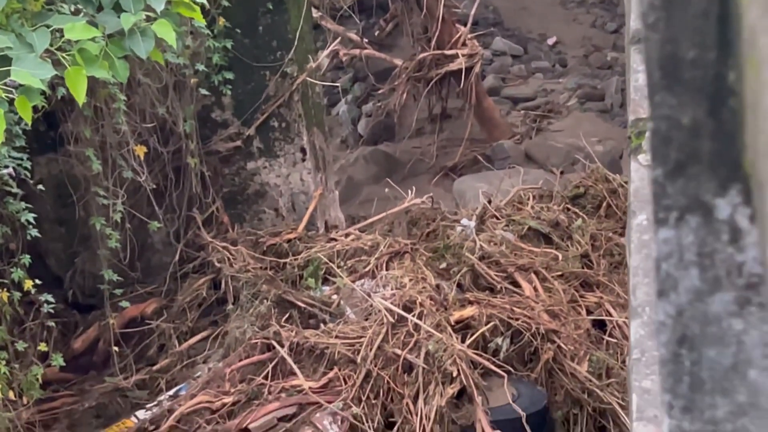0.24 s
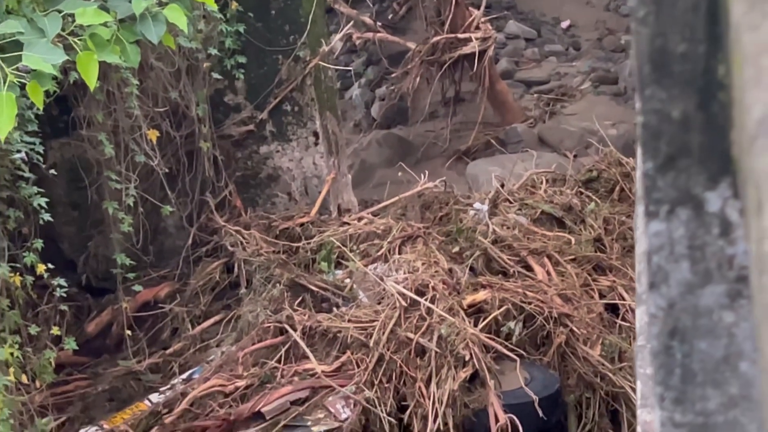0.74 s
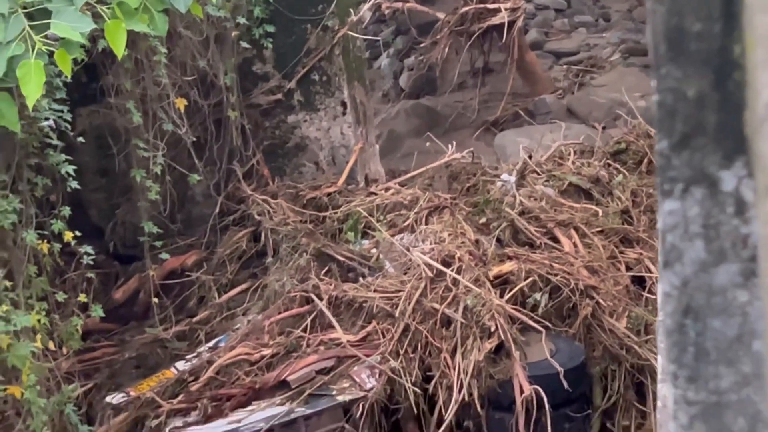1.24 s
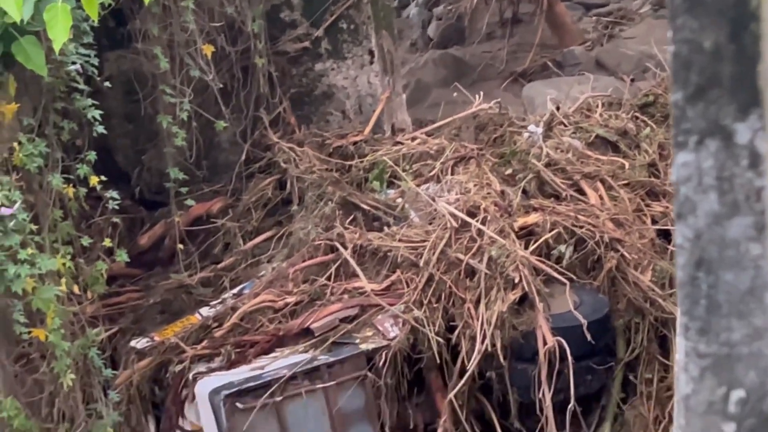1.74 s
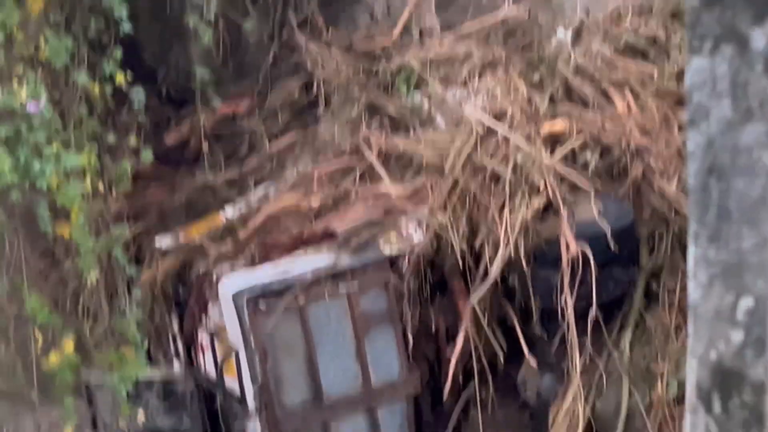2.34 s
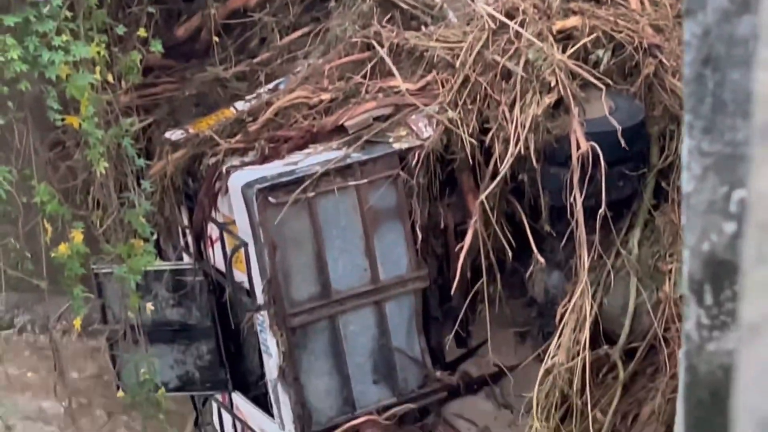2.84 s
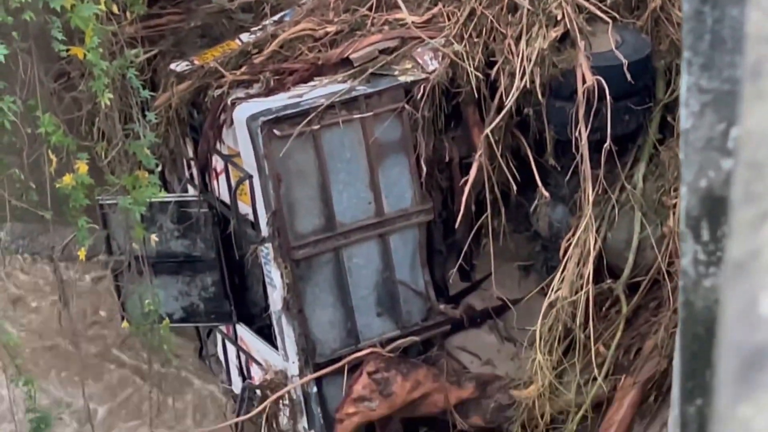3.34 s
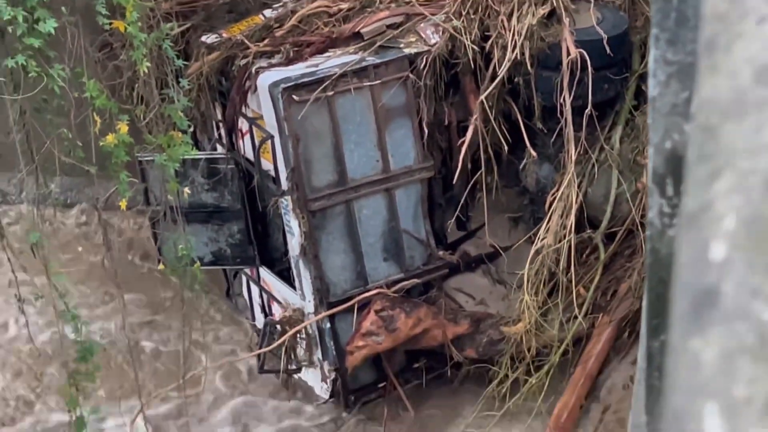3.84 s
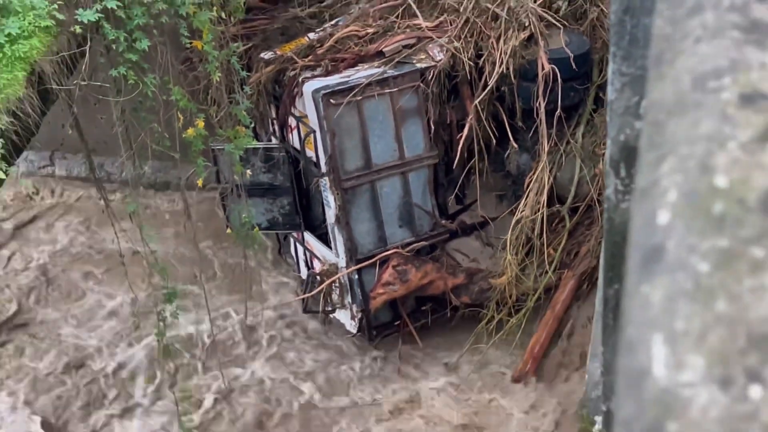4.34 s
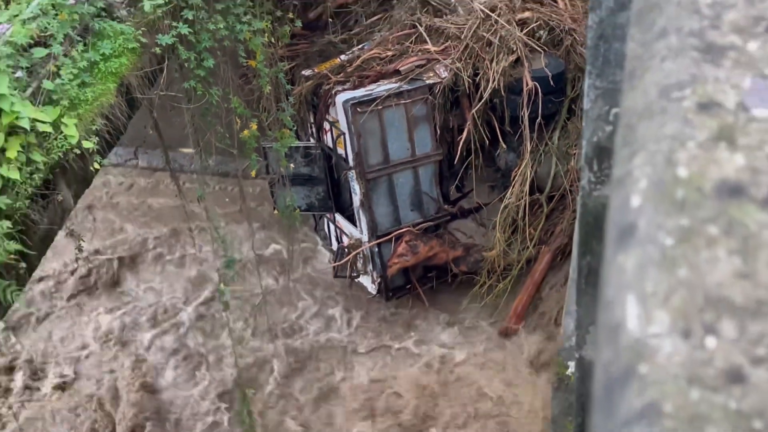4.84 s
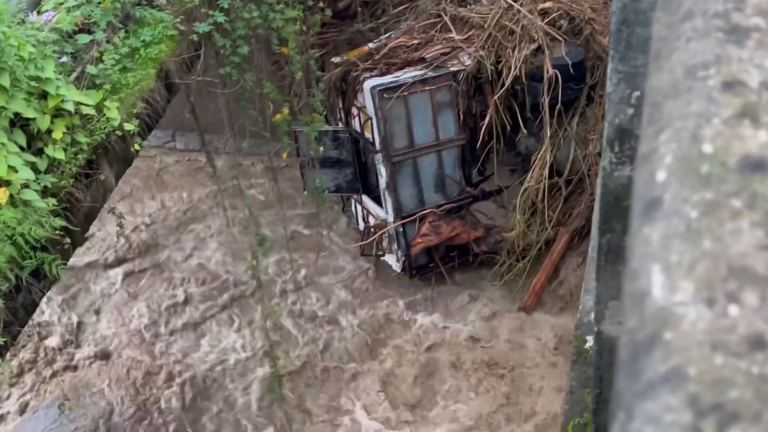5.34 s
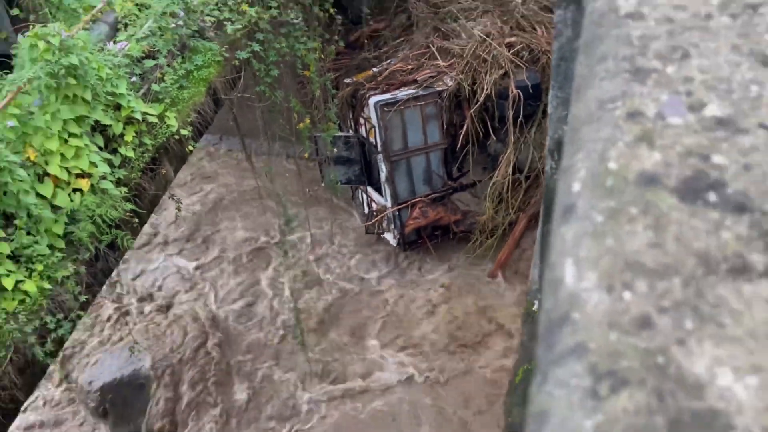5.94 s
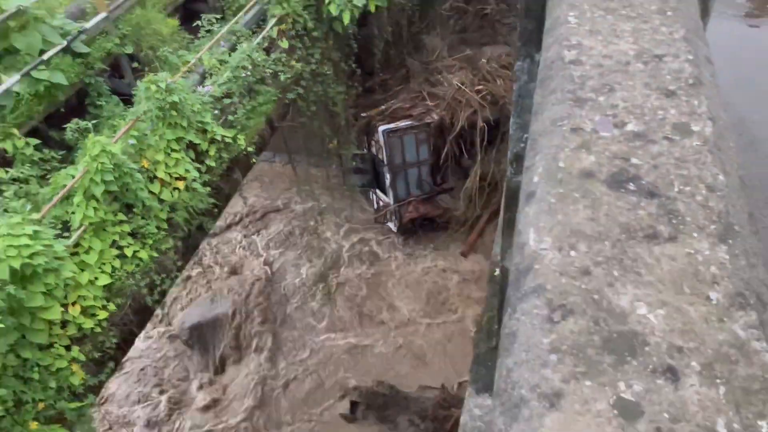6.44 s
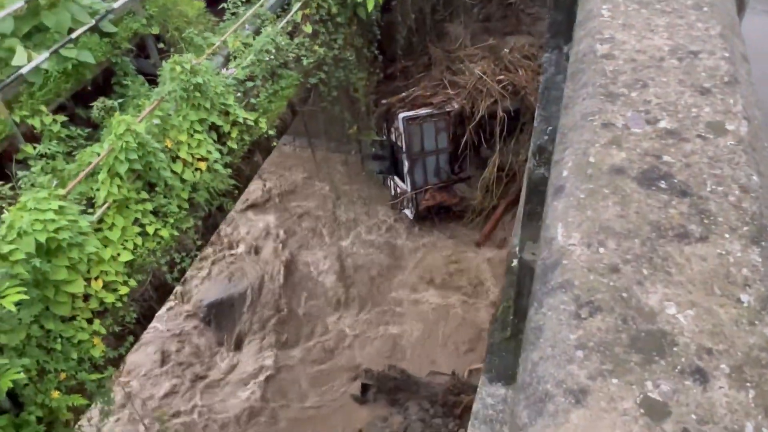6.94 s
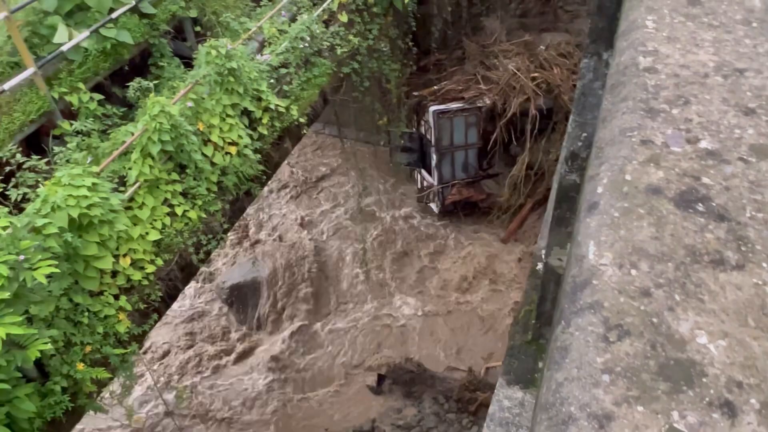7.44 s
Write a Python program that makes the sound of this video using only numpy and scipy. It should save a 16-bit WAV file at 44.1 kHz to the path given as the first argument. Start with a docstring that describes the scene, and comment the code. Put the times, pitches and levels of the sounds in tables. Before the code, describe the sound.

A continuous broadband river roar, heavy in the lows and low mids, with soft fizz on top and faint momentary swells. After about four seconds a faint piercing squeak and wavering squeal sound briefly, slightly left, like wet friction. Around six seconds the microphones open from a narrow focused beam to a broad stereo view of the same rushing water, which never stops.

```python
"""Flooded river under a bridge

A flooded river roars under a bridge, heard from the parapet: shaped noise for churning water and spray,
ringing bubbles, and brief random swells in narrow bands. A thin squeal, like a wet brake, sounds briefly,
made of gliding sine tones. The camera zooms out, and its microphones go from a narrow, nearly mono
beam to a wide stereo pair."""
import sys
import numpy as np
from scipy import signal
from scipy.fft import rfft, irfft, next_fast_len
from scipy.io import wavfile
from scipy.ndimage import uniform_filter1d, map_coordinates

SR = 44100
rng = np.random.default_rng(int(sys.argv[2]) if len(sys.argv) > 2 else 0)


def persist_wave(psi):
    """Save psi, clipped to +-1, as 16-bit WAV."""
    counts = np.round(np.clip(psi, -1, 1) * 32767).astype(np.int16)
    wavfile.write(sys.argv[1], SR, np.atleast_2d(counts).T)


N = 338247

# tone shape of the water's roar: (frequency [Hz], relative level [dB per Hz])
ROAR_SHAPE = [(22, -35), (32, -26), (50, -8.5), (85, -2), (150, -0.66), (320, -.4), (420, -3), (580, -6),
              (1000, -5.5), (1350, -8.5), (3000, -15.5), (5500, -20), (7000, -23.5), (15500, -29.5)]
# level of the spray before the microphones: (time [s], level [dB])
SPRAY_LEVEL = [(0, -29), (2.0, -29), (2.8, -28.2), (3.7, -29), (5.2, -27.5), (6.0, -28.5), (6.6, -28.5),
               (7.5, -27.5)]
# the churn is steady but for one slow surge
CHURN_DB = -27
SURGE_AT_S, SURGE_WIDTH_S, SURGE_DB = 5, 0.98, 0.7

# brief random swells of the roar in narrow bands:
# (time [s], pitch [Hz], level [dB], half duration [s])
SWELLS = [(1.45, 530, -37, .14), (1.54, 185, -34.5, 0.069), (2.143, 300, -34, .07), (2.8, 870, -37, .23),
          (3.11, 135, -34, 0.13), (5.0, 265, -33.5, 0.22), (5.11, 80, -35.5, .06), (5.43, 507, -37, .16),
          (7.48, 1700, -42, .08)]
SWELL_SPREAD = 0.19  # half bandwidth as a share of the pitch

# short double squeak before the squeals: (time [s], pitch [Hz], level [dB])
SQUEAK = [(4.265, 3584, -52), (4.281, 3596, -42), (4.311, 3592, -36.7), (4.334, 3597, -39),
          (4.344, 3610, -50), (4.362, 3622, -37), (4.377, 3660, -39), (4.386, 3670, -50)]
SQUEAK_OCTAVE_DB = -10  # relative to the squeak
# two joined squeals, each a list of (time [s], pitch [Hz], level [dB])
SQUEALS = [
    [(4.405, 4840, -53), (4.432, 4830, -48), (4.470, 4792, -33), (4.522, 4765, -36), (4.542, 4700, -38),
     (4.565, 4668, -31.5), (4.579, 4650, -45), (4.604, 4650, -43), (4.62, 4620, -37), (4.644, 4643, -32.5),
     (4.658, 4639, -39), (4.686, 4694, -28), (4.701, 4770, -28.5), (4.714, 4790, -40), (4.735, 4847, -42)],
    [(4.725, 4841, -41), (4.765, 4851, -47), (4.805, 4850, -44), (4.82, 4860, -38), (4.856, 4820, -35.5),
     (4.885, 4760, -45), (4.922, 4785, -40), (4.937, 4800, -36), (4.972, 4760, -31), (4.996, 4772, -37),
     (5.003, 4800, -47), (5.011, 4820, -34), (5.028, 4800, -38.5), (5.05, 4800, -38), (5.084, 4860, -41.5),
     (5.105, 4894, -55)],
]
# where the friction bites hardest in each squeal and brings in overtones:
# (time [s], half width [s], octave level [dB], twelfth level [dB])
BITES = [(4.607, 0.083, -41, -34), (4.908, .05, -41, -53)]
# the split tone: its level, the squeal level where it sets in, the further rise that brings it fully in
SPLIT_DB, SPLIT_ABOVE_DB, SPLIT_RANGE_DB = -41, -32, 3
WAVER = 0.0013  # random unsteadiness of the pitch, as a share of it
EDGE_S = 0.008  # attack and release of each squeak or squeal

# tone colour of the narrow beam: (frequency [Hz], gain [dB])
BEAM_COLOUR = [(580, 0), (830, -1.5), (1100, -1), (1280, -3.5), (1420, -1.9), (1930, -1.8), (2130, -5),
               (2350, 0), (2900, 1), (3600, -2.05), (4400, -3.2), (5200, -6), (7300, 3.5), (8300, 3),
               (9500, -.5), (15500, 0.6)]
# how alike left and right are in the beam: (frequency [Hz], likeness [1 = same])
BEAM_ALIKE = [(60, .98), (320, .97), (800, 0.74), (1250, 0.82), (1600, 1), (7400, 1), (7700, 0.75),
              (9000, 1), (10100, 1), (11600, 0.81), (13300, 0.9), (15200, .6)]
# loudness balance of the beam: (frequency [Hz], left minus right [dB])
BEAM_BALANCE = [(60, 0), (180, 2.5), (400, -1.5), (750, 3.5), (1100, 7), (1450, -0.5), (2000, 0)]
# phase of the beam below the treble: (frequency [Hz], left ahead of right [rad])
BEAM_LEAD = [(350, 0), (600, 0.97), (800, 1.18), (1200, 0.57), (1350, 0.028), (7400, 0.0042)]
# tone colour of the wide pair: (frequency [Hz], gain [dB])
WIDE_COLOUR = [(500, 0), (850, 1.6), (1350, -0.5), (1620, 2), (1850, -2.2), (2050, 0), (2350, -2),
               (3000, 0.1), (6000, 0.5), (7000, -0.7), (9500, -1.5), (11000, 1), (15500, -0.5)]
# how alike left and right are in the wide pair: (frequency [Hz], likeness [1 = same])
WIDE_ALIKE = [(60, 1), (330, 0.87), (470, 0.63), (630, 0.74), (850, 0.3), (1200, 0.8), (1500, .15),
              (2400, 0.38), (3600, 0.15), (6500, .15), (10100, 1), (11600, 1), (13300, .96), (15200, .6)]
# loudness balance of the wide pair: (frequency [Hz], left minus right [dB])
WIDE_BALANCE = [(60, 1.8), (190, 2.6), (430, -2), (660, 3), (1050, 7.3), (1350, 1), (1550, 4), (1900, 3.4),
                (2100, 0), (2550, 7), (3200, 4), (5200, 10.9), (6100, 10.0), (7500, 1), (8300, 3.5),
                (9200, -1.5)]
# phase of the wide pair below the treble: (frequency [Hz], left ahead of right [rad])
WIDE_LEAD = [(370, -.1), (620, 1.8), (1150, 2.3), (1430, 4), (1600, 2), (2000, .6), (2400, 3.8),
             (3400, 2.8), (3900, .2), (4500, 1.6), (5400, 4.1), (6200, 2.6), (6900, 0)]
# treble phase shared by both patterns: left and right are opposed near 10 kHz and in step again
# near 13 kHz: (frequency [Hz], left ahead of right [rad])
TREBLE_LEAD = [(7500, -.05), (8600, -1), (9400, -3), (10800, -3.35), (12400, -6), (14300, -6.5),
               (15700, -8.7)]
# the stereo image opens as the camera zooms out
ZOOM_START_S, ZOOM_LENGTH_S = 5.95, 0.44
TOP_HZ = 15830  # nothing is kept from here up


def river(split_hz=650):
    """Big air pockets gulp in the churn; small bubbles and spray hiss on the breaking waves."""
    t = np.arange(N) / SR
    gulps = bubbles(low_hz=112.5, high_hz=698.0, cycles=5.37, rise=0.077, spread_db=2.0, count=700, size=2200)
    fizz = bubbles(low_hz=1082, high_hz=12000, cycles=5.0, rise=0.11, spread_db=1.5, count=12000, size=160)

    def low_share(hz):
        """Share of the power that goes to the churn; the spray gets the rest."""
        return 1 / (1 + (hz / split_hz) ** 4)

    def churn_shape(hz):
        return amp(along(ROAR_SHAPE, hz)) * np.sqrt(low_share(hz))

    def spray_shape(hz):
        return amp(along(ROAR_SHAPE, hz)) * np.sqrt(1 - low_share(hz))

    churn = filtered(turbulence(patchy_db=0.05) + amp(-25) * gulps, churn_shape)
    spray = filtered(turbulence(patchy_db=0.46) + amp(-12.5) * fizz, spray_shape)
    surge_db = SURGE_DB * np.exp(-((t - SURGE_AT_S) / SURGE_WIDTH_S) ** 2)
    churn_db = CHURN_DB + surge_db + 0.15 * wobble(8.9)
    spray_db = curves(SPRAY_LEVEL)[0] + 0.22 * wobble(18)
    return amp(churn_db) * unit(churn) + amp(spray_db) * unit(spray)


def turbulence(patchy_db):
    """Rushing water as two unrelated noises that share short patches of random gain."""
    noise = signal.stft(rng.standard_normal((2, N)), nperseg=512)[2]
    patches = rng.standard_normal(noise.shape[1:])
    patches = uniform_filter1d(patches, size=7, axis=0)  # blur over frequency
    patches = uniform_filter1d(patches, size=16, axis=1)  # blur over time
    patchy = noise * amp(patchy_db * unit(patches))
    return unit(signal.istft(patchy, nperseg=512)[1][:, :N])


def bubbles(low_hz, high_hz, cycles, rise, spread_db, count, size):
    """A cloud of fading rings on two channels; each climbs in pitch as its bubble nears the surface."""
    when, pitch, bulk, place = rng.random((count, 4)).T[:, :, None]
    hz = low_hz + (high_hz - low_hz) * pitch
    turns = hz * np.arange(size) / SR
    age = turns / cycles  # 1 when the ring has faded to 1/e
    ring = np.sin(2 * np.pi * turns * (1 + rise * np.minimum(age, 2) / 2)) * np.exp(-age)
    # a few bubbles are much louder than the rest
    ring *= np.sqrt(hz) * amp(-spread_db * np.log(np.maximum(bulk, 1 / 100)))
    at = (when * N).astype(int) + np.arange(size)
    angle = 2 * np.pi * place
    # add every ring into each channel at its own time
    channels = [np.bincount(at.ravel(), (ring * gain).ravel(), N)[:N]
                for gain in (np.cos(angle), np.sin(angle))]
    return unit(np.array(channels))


def swells():
    """Brief random swells of the roar in narrow bands, each a soft burst of noise around one pitch."""
    t, sound = np.arange(N) / SR, np.zeros((2, N))
    for at, hz, level_db, width in SWELLS:
        noise = rng.standard_normal((2, N))
        band = filtered(noise, lambda f: np.exp(-((f / hz - 1) / SWELL_SPREAD) ** 2))
        rise_and_fall = np.exp(-((t - at) / width) ** 2)
        sound += amp(level_db) * rise_and_fall * unit(band)
    return sound


def squeal(overtone_flutter_db=4.5):
    """Friction catches briefly on a low note, then sings on a higher one that turns shrill as it bites."""
    t = np.arange(N) / SR
    sound, gate, phase = friction_tone(SQUEAK)
    octave_db = SQUEAK_OCTAVE_DB + curves(SQUEAK)[1]
    sound = sound + amp(octave_db) * gate * np.sin(2 * phase)
    for note, (at, width, *levels_db) in zip(SQUEALS, BITES):
        tone, gate, phase = friction_tone(note)
        bite = np.exp(-((t - at) / width) ** 4)
        sound = sound + tone
        for multiple, db in enumerate(levels_db, 2):  # higher overtones need a harder bite
            strength = amp(db + overtone_flutter_db * wobble(80)) * bite ** (multiple - 1)
            sound = sound + gate * strength * np.sin(multiple * phase)
    return sound


def friction_tone(note, flutter_db=1.0):
    """One stroke as a sine that flutters as if echoes come and go, with its gate and running phase."""
    t, start, end = np.arange(N) / SR, note[0][0], note[-1][0]
    hz, level_db = curves(note)
    phase = 2 * np.pi * np.cumsum(hz * (1 + WAVER * wobble(120))) / SR
    # the root of 2 makes the levels rms levels
    gate = np.sqrt(2) * np.clip(np.minimum(t - start, end - t) / EDGE_S, 0, 1)
    tone = amp(level_db + flutter_db * wobble(70)) * np.sin(phase)
    # at its loudest the vibration doubles its period and adds a partial a fifth up
    split_share = np.clip((level_db - SPLIT_ABOVE_DB) / SPLIT_RANGE_DB, 0, 1)
    split = amp(SPLIT_DB) * split_share * np.sin(1.5 * phase)
    return gate * (tone + split), gate, phase


def pickup(pair, colour, alike, balance, lead):
    """A microphone pattern: mixes a shared and an unshared sound into left and right."""
    def blend(hz):
        """Gains of the shared and unshared sounds that give the wanted likeness."""
        angle = np.arccos(np.clip(along(alike, hz), 0, 1)) / 2
        return amp(along(colour, hz)) * np.array([np.cos(angle), np.sin(angle)])

    def sides(hz):
        """Level and phase of left and right, at constant total power."""
        left = amp(along(balance, hz) / 2) * np.exp(1j * along(lead + TREBLE_LEAD, hz) / 2)
        both = np.array([left, 1 / left])
        return both / np.sqrt(np.mean(abs(both) ** 2, axis=0))

    shared, apart = filtered(pair, blend)
    return filtered(np.array([shared + apart, shared - apart]), sides)


def amp(db):
    """Decibels to gain."""
    return 10 ** (np.asarray(db) / 20)


def unit(x):
    """Scale to rms 1."""
    return x / np.sqrt(np.mean(x ** 2) + 1e-20)


def along(points, hz):
    """Read a curve of (frequency [Hz], value) points on a log frequency axis."""
    f, v = np.transpose(points)
    return np.interp(np.log(hz + 1), np.log(f + 1), v)


def curves(rows):
    """One value per sample for each column after the time."""
    s, *cols = np.transpose(rows)
    return [np.interp(np.arange(N) / SR, s, c) for c in cols]


def wobble(rate):
    """A smooth random curve shaped by rate random points a second."""
    points = rng.standard_normal(int(N * rate / SR) + 4)
    return map_coordinates(points, [np.arange(N) * rate / SR])


def filtered(x, response):
    """Change the level and phase of each frequency in x by a response."""
    m = next_fast_len(N + SR // 2)  # spare room keeps the end from wrapping round to the start
    return irfft(rfft(x, m) * response(np.fft.rfftfreq(m, 1 / SR)), m)[..., :N]


def scene():
    """The river through the narrow beam, then through the wide pair as the zoom opens, plus the squeal."""
    water = river() + swells()
    # the wide pair takes in more distant stretches of the same flow, whose sound arrives later
    farther = np.roll(water, SR // 20, axis=1)
    beam = pickup(water, BEAM_COLOUR, BEAM_ALIKE, BEAM_BALANCE, BEAM_LEAD)
    wide = pickup(farther, WIDE_COLOUR, WIDE_ALIKE, WIDE_BALANCE, WIDE_LEAD)

    def squeal_sides(hz):
        """The squeal is one point, a little to the left: alike on both sides but for its phase."""
        lead = along(BEAM_LEAD + TREBLE_LEAD, hz) + 0.51  # radians
        return np.exp(1j * np.outer([1, -1], lead) / 2)

    tone = filtered(squeal(), squeal_sides)
    width = np.clip((np.arange(N) / SR - ZOOM_START_S) / ZOOM_LENGTH_S, 0, 1)
    return np.sqrt(1 - width) * beam + np.sqrt(width) * wide + tone


def record(dry):
    """The camera keeps nothing above its band limit."""
    return filtered(dry, lambda hz: hz < TOP_HZ)


dry = scene()
out = record(dry)
persist_wave(out)
```